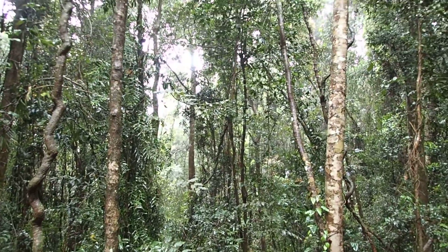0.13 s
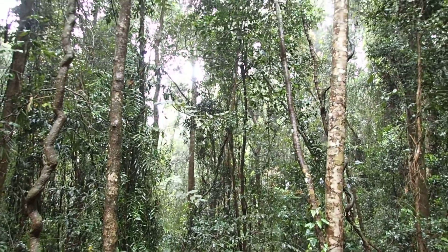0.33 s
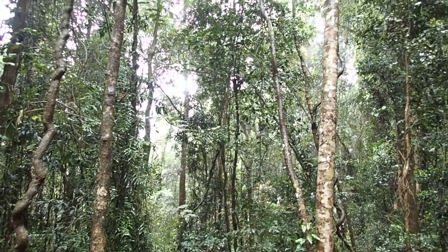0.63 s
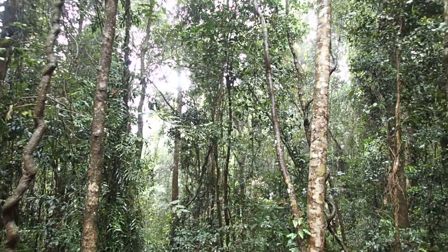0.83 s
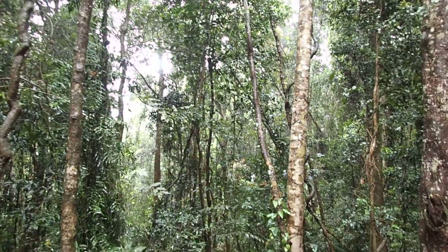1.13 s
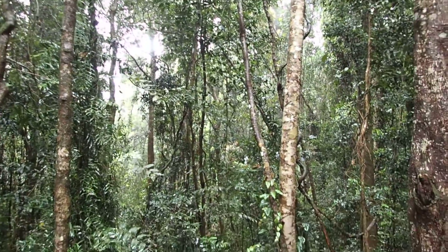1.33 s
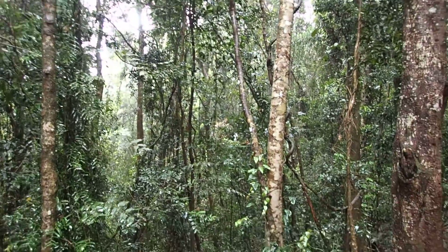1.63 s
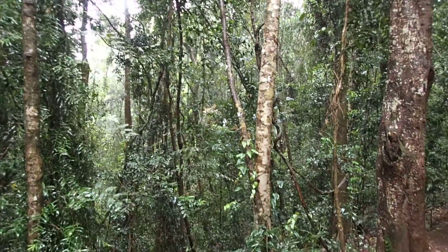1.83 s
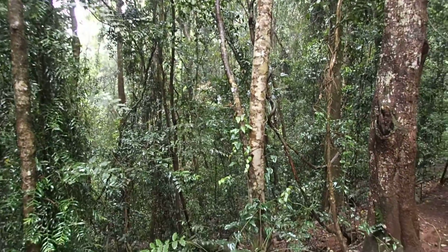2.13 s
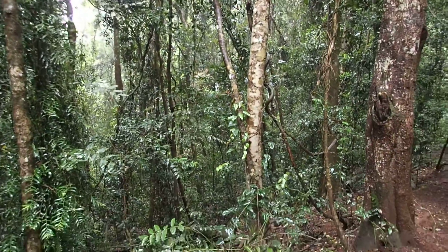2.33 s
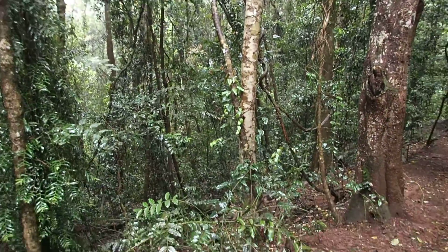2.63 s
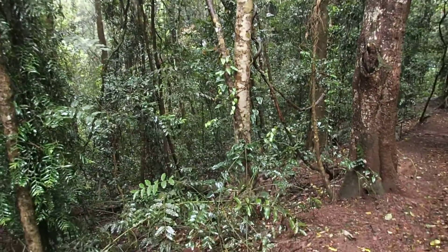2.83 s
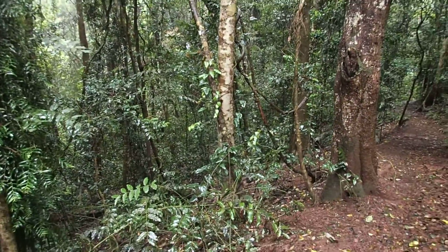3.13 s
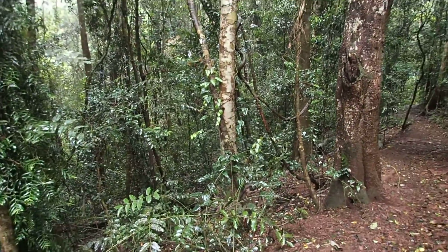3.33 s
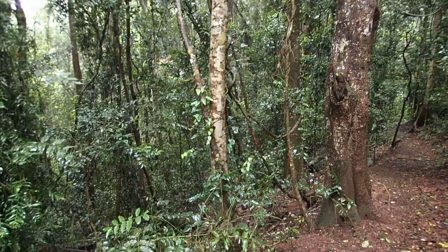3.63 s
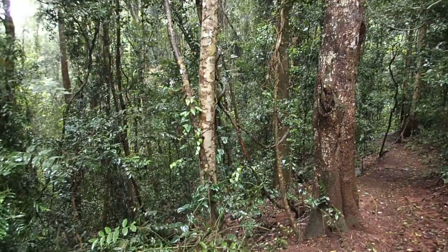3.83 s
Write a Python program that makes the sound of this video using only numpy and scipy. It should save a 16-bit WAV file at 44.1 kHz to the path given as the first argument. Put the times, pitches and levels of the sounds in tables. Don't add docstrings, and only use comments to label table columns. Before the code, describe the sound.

A whipbird finishes a fluttering whistle, dips low, then cracks a fast rising whip that echoes among trunks; a far small bird repeats chip-and-rise notes over soft hush and drips, heard by a small camera microphone.

```python
import sys
import numpy as np
from scipy import signal
from scipy.fft import rfft, irfft
from scipy.io import wavfile
from scipy.ndimage import uniform_filter1d

SR = 44100
rng = np.random.default_rng(int(sys.argv[2]) if len(sys.argv) > 2 else 0)


def persist_wave(psi):
    counts = np.round(np.clip(psi, -1, 1) * 32767).astype(np.int16)
    wavfile.write(sys.argv[1], SR, np.atleast_2d(counts).T)


def gain_from_decibels(decibels):
    exponent = np.asarray(decibels, float) / 20
    return 10 ** exponent


N = 176400
LEAD = SR
M = N + LEAD
T = (np.arange(M) - LEAD) / SR
HZ = np.maximum(np.arange(M // 2 + 1) * SR / M, 1)

# freq_hz, density_db
HUSH_SPECTRUM = [(25, -7.5), (70, -1.5), (150, -1), (400, -6.5), (1500, -11), (2600, -17.5), (9000, -17),
                 (15500, -21)]
# freq_hz, correlation
HUSH_CORRELATION = [(30, .72), (250, 0.53), (1000, 0.38), (3000, 1), (5000, 1), (9000, -0.28),
                    (15000, -0.069)]
# centre_hz, width_hz, level_db, correlation
INSECT_BANDS = [(3170, 440, -70, 0.83), (4660, 270, -62.5, 0.7), (5385, 890, -46, 0.87),
                (5780, 1100, -57.5, 0.34), (7400, 1970, -59, 0.48)]
# hit_s, peak_db, ring_hz, width_octaves, length_ms
LEAF_DROPS = [(.966, -41, 900, 1.5, 4), (1.0091, -29, 7360, 0.32, 1.5), (1.1922, -28.5, 4840, 1.08, 1),
              (1.4566, -36.5, 3070, 1.2, 2.5), (1.485, -31.5, 7400, 0.33, 1.1),
              (1.8282, -46, 2500, 1.6, 3.1), (1.947, -40.5, 990, 2.3, 5), (2.0173, -45, 8000, 0.38, 1.5),
              (2.19, -48, 1000, 1.5, 4), (2.3031, -38.5, 14100, .3, 1.2), (.365, -50.5, 646, 0.41, 11),
              (2.849, -42.5, 330, 0.83, 6.4), (2.958, -50, 1720, .8, 3.5), (3.125, -44.5, 1770, 1.6, 4.6),
              (3.275, -45, 2600, 1.2, 2.5), (3.315, -33, 1420, 2.7, 2.1), (3.326, -54, 1800, 2.2, 2.5),
              (3.4615, -43, 3035, .6, 2.5), (3.6, -52, 1400, 0.7, 4), (3.808, -40.5, 1000, 1.5, 4),
              (3.971, -35, 1280, 2.94, 3.4)]
PHRASE_STARTS = [-.62, -.4, -.18, .039, .256, .475, .693, .913, 1.138, 1.363, 1.595, 1.825, 2.053, 2.285,
                 2.518, 2.753, 2.984, 3.218, 3.456, 3.685, 3.919]
# after_start_s, pitch_hz, level_db
CHIP_CONTOUR = [(-.006, 7600, -34), (-.002, 7350, -15), (.012, 6300, -13), (.026, 5800, -6),
                (.048, 5200, -1), (.064, 4950, -1), (.077, 4650, -11), (.1, 4350, -28)]
# after_start_s, rise_share_0_1, level_db
RISE_CONTOUR = [(.125, 0, -30), (.133, .05, -2), (.15, .5, -1), (.168, .88, -2), (.188, 1.0, -4),
                (.218, .95, -7), (.232, .9, -30)]
# time_s, pitch_hz, level_db
HELD_CONTOUR = [(-.5, 2290, -66), (0, 2290, -70), (0.058, 2304, -51), (.12, 2246, -61), (0.156, 2268, -63),
                (0.189, 2302, -43.5), (.22, 2278, -44.5), (.245, 2274, -66), (.31, 2280, -54)]
# time_s, pitch_hz, level_db
DIP_CONTOUR = [(.305, 2150, -74), (0.326, 1930, -55), (.35, 1625, -55), (0.382, 1516, -44),
               (0.431, 1476, -54), (.47, 1443, -64), (.5, 1478, -75)]
# time_s, pitch_hz, level_db
WHIP_CONTOUR = [
    (.558, 1765, -59),
    (.574, 1778, -47),
    (0.585, 1835, -50),
    (.598, 2217, -41.5),
    (.614, 3096, -33.5),
    (0.636, 4550, -31),
    (0.644, 5040, -19),
    (0.667, 6960, -29),
    (0.691, 7520, -35),
]
# time_s, pitch_hz, level_db
ANSWER_CONTOUR = [
    (2.18, 2700, -80),
    (2.2, 2880, -64),
    (2.24, 3320, -63),
    (2.3, 3630, -72),
]
# centre_hz, width_hz, depth_0_1
HOUSING_NOTCHES = [(1875, 92, 0.82), (2700, 340, .3), (3370, 100, 0.64), (4030, 200, 0.69),
                   (4760, 100, 0.97)]


def level(x, db):
    return x * gain_from_decibels(db) / np.sqrt(np.mean(x ** 2))


def walk(rate_hz):
    curve = np.interp(T * rate_hz, np.arange(-400, 1600), rng.standard_normal(2000))
    return 1.29 * uniform_filter1d(curve, int(SR / rate_hz))


def mix_pair(mid, side, correlation):
    return np.sqrt(1 + correlation) * mid + np.sqrt(1 - correlation) * side * np.array([[1], [-1]])


def pair(correlation, size):
    mid, side = rng.standard_normal((2, size))
    return mix_pair(mid, side, np.clip(correlation, -.99, .99)) / np.sqrt(2)


def pan(db):
    return gain_from_decibels(np.array([[db], [-db]]) / 2)


def whistle(time_s, pitch_hz, level_db, wobble_hz, overtone_db=-60):
    out = np.zeros(M)
    on = slice(*np.searchsorted(T, [time_s[0], time_s[-1]]))
    t = T[on]
    hz = np.interp(t, time_s, pitch_hz)
    phase = 2 * np.pi * np.cumsum(hz + wobble_hz[on]) / SR
    gate = np.clip(np.minimum(t - time_s[0], time_s[-1] - t) / 0.0054, 0, 1)
    third = 2.4 * np.sin(3 * phase) * (hz < SR / 10)
    tone = np.sin(phase) + gain_from_decibels(overtone_db) * (np.sin(2 * phase) + third)
    out[on] = np.sqrt(2) * gate * gain_from_decibels(np.interp(t, time_s, level_db)) * tone
    return out


def trunks(x, direct_db, t60_s, correlation, tail_db, tail_t60_s):
    t = np.arange(int(1.5 * SR)) / SR
    early = gain_from_decibels(-60 * t / t60_s) / np.sqrt(t60_s)
    tail = gain_from_decibels(tail_db - 60 * t / tail_t60_s) / np.sqrt(tail_t60_s)
    echo = pair(correlation, len(t)) * (early + tail) * np.sqrt(2 * np.log(1000) / SR)
    echo[:, 0] = gain_from_decibels(direct_db)
    return signal.fftconvolve(x[None], echo, axes=1)[:, :M]


def air(correlation):
    freq_hz, density_db = np.array(HUSH_SPECTRUM).T
    gain = gain_from_decibels(np.interp(np.log(HZ), np.log(freq_hz), density_db))
    mid, side = rfft(rng.standard_normal((2, M)))
    spectrum = gain * mix_pair(mid, side, correlation)
    place, swell = np.log2(HZ / 16) / 2, walk(1.46)
    out = np.zeros((2, M))
    for k in range(6):
        band = np.cos(np.pi / 2 * np.clip(place - k, -1, 1)) ** 2
        flicker_db = 2 * walk(8.2) / (1 + 0.54 * k)
        out += irfft(spectrum * band, M) * gain_from_decibels(0.42 * swell + flicker_db)
    return level(out, -53.5)


def insects():
    out = np.zeros((2, M))
    for centre_hz, width_hz, level_db, correlation in INSECT_BANDS:
        band = np.exp(-2 * ((HZ - centre_hz) / width_hz) ** 2)
        noise = irfft(rfft(pair(correlation, M)) * band, M)
        out += level(noise, level_db) * gain_from_decibels(1.1 * walk(6.15))
    return out


def hush():
    freq_hz, share = np.array(HUSH_CORRELATION).T
    correlation = np.clip(np.interp(np.log(HZ), np.log(freq_hz), share), -.9, .99)
    return pan(1) * (air(correlation) + insects())


def patter():
    u = rng.random((1000, 4))[:45 * 5]
    hit_s, peak_db = 5 * u[:, 0] - 1, -54.5 + 9 * u[:, 1] ** 3
    ring_hz = 600 * 2 ** (3.6 * u[:, 2])
    return np.c_[hit_s, peak_db, ring_hz, .6 + u[:, 3], 1.5 + 2.5 * u[:, 3]]


def drops():
    size = 2048
    out, t = np.zeros(M + 2 * size), np.arange(size) / SR
    f = np.maximum(np.arange(size // 2 + 1) * SR / size, 1)
    for hit_s, peak_db, ring_hz, octaves, length_ms in [*LEAF_DROPS, *patter()]:
        attack = np.where(t < .01, 6, 1)
        burst = rng.standard_normal(size) * np.exp(-np.abs(t - .01) * 1000 / length_ms * attack)
        leaf = np.exp(-2 * (np.log2(f / ring_hz) / octaves) ** 2)
        snap = gain_from_decibels(-23) * (ring_hz > 2000)
        tap = irfft(rfft(burst) * (leaf + snap))
        i = int(np.clip((hit_s - .01) * SR + LEAD, 0, M))
        out[i:i + size] += tap * gain_from_decibels(peak_db - 3) / np.abs(tap).max()
    dry_taps = out[:M]
    echoes = trunks(dry_taps, direct_db=0, t60_s=0.28, correlation=0.31, tail_db=1, tail_t60_s=.8)
    return pan(1) * (echoes * gain_from_decibels(-7.5) + dry_taps)


def singer():
    chip_s, chip_hz, chip_db = np.array(CHIP_CONTOUR).T
    rise_s, rise_share, rise_db = np.array(RISE_CONTOUR).T
    low_hz, top_first_hz, top_last_hz, settle_s = 4960, 5950, 5600, 1.9
    voice, wobble_hz = np.zeros(M), 28.5 * walk(90)
    for start_s in PHRASE_STARTS:
        chip_bend, chip_loud, top_bend = rng.standard_normal(3)
        top_hz = top_last_hz + (top_first_hz - top_last_hz) * np.exp(-max(start_s, 0) / settle_s)
        top_hz *= 1 + 0.0049 * top_bend
        voice += whistle(start_s + chip_s, chip_hz * (1 + .008 * chip_bend), chip_db + chip_loud, wobble_hz)
        voice += whistle(start_s + rise_s, low_hz + rise_share * (top_hz - low_hz), rise_db, wobble_hz)
    opening_db = -5.5 * np.clip(1 - T / .5, 0, 1)
    voice *= gain_from_decibels(-37 + opening_db + 2.77 * walk(60))
    return pan(3) * trunks(voice, direct_db=-11, t60_s=.75, correlation=0.84, tail_db=-28, tail_t60_s=0.87)


def whipbird():
    wobble_hz = 9 * walk(41.7)
    flutter = 1 + 0.84 * np.sin(2 * np.pi * 35 * T) * (T < 0.091)
    held = flutter * whistle(*np.array(HELD_CONTOUR).T, wobble_hz)
    dip = whistle(*np.array(DIP_CONTOUR).T, wobble_hz)
    soft = (held + dip) * gain_from_decibels(2 * walk(35.8))
    whip = whistle(*np.array(WHIP_CONTOUR).T, wobble_hz, overtone_db=-41.5)
    sharp = whip + whistle(*np.array(ANSWER_CONTOUR).T, 8 * wobble_hz)
    near = trunks(soft, direct_db=0, t60_s=0.26, correlation=1.0, tail_db=-7, tail_t60_s=2.1)
    ringing = trunks(sharp, direct_db=0, t60_s=0.58, correlation=0.92, tail_db=-13.5, tail_t60_s=2.5)
    return pan(3) * (near + ringing)


def scene():
    return (hush() + drops() + singer() + whipbird())[:, LEAD:]


def low_pass(x):
    return signal.sosfilt(signal.butter(12, 15730, fs=SR, output="sos"), x)


def record(dry):
    f = np.arange(N // 2 + 1) * SR / N
    colour = np.ones(len(f))
    for centre_hz, width_hz, depth in HOUSING_NOTCHES:
        colour *= 1 - np.clip(depth, 0, .97) / (1 + (2 * (f - centre_hz) / width_hz) ** 2)
    mix = irfft(rfft(dry) * colour, N)
    return low_pass(mix)


dry = scene()
out = record(dry)
persist_wave(out)
```